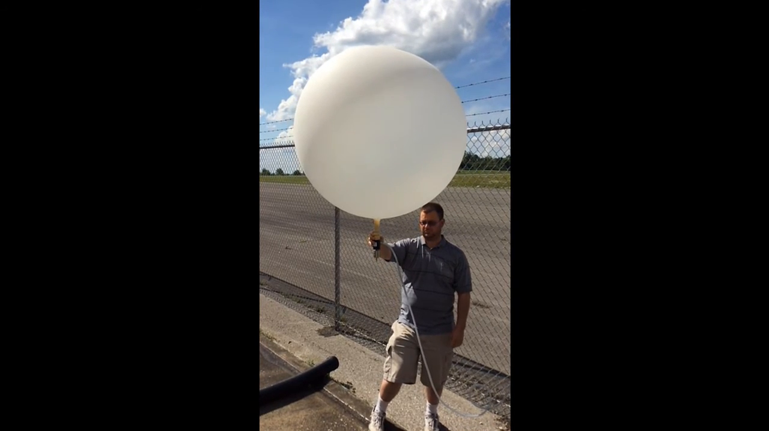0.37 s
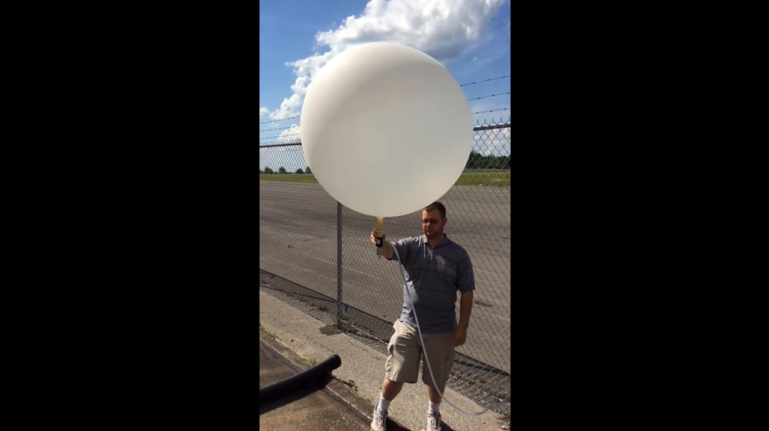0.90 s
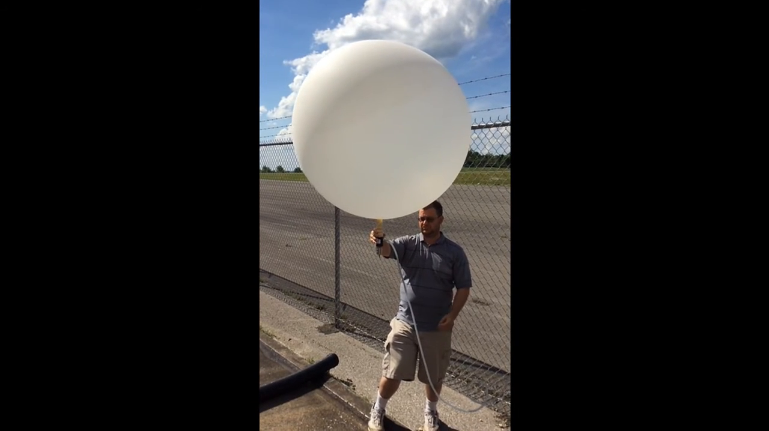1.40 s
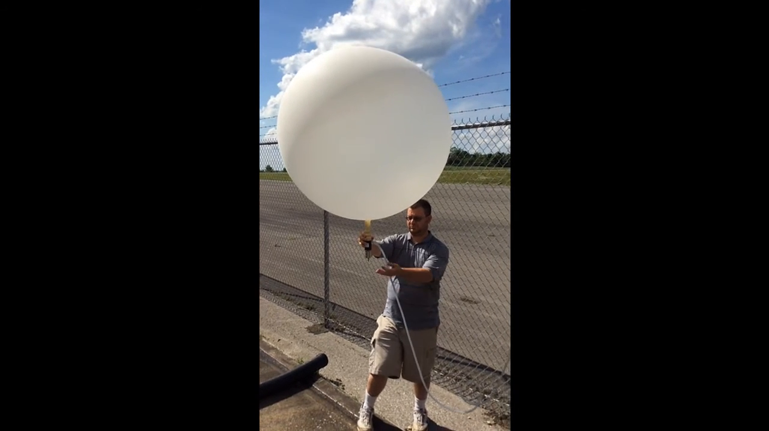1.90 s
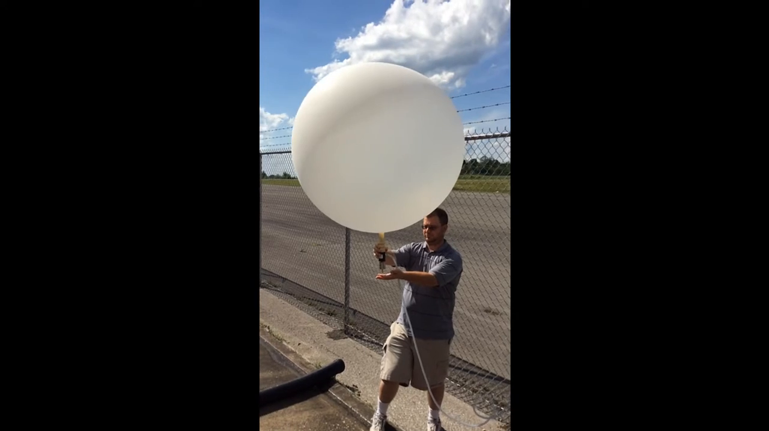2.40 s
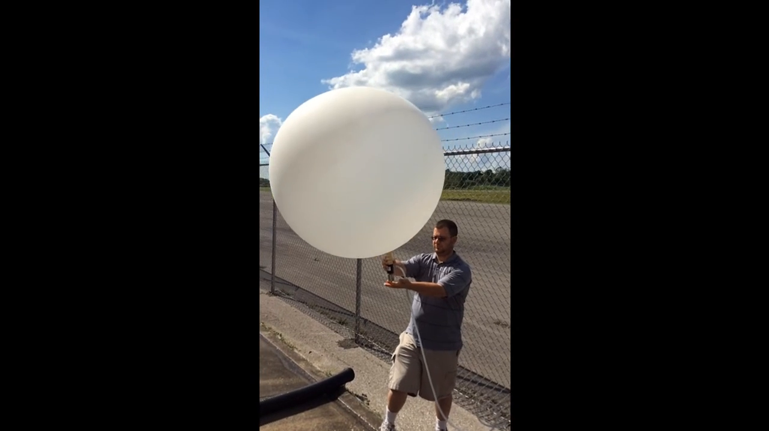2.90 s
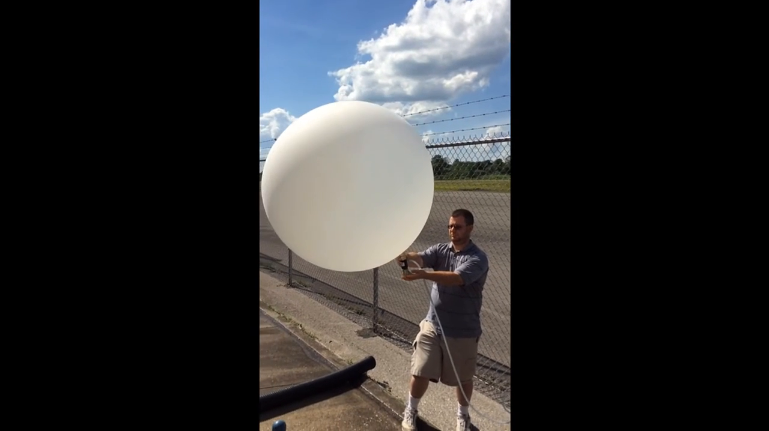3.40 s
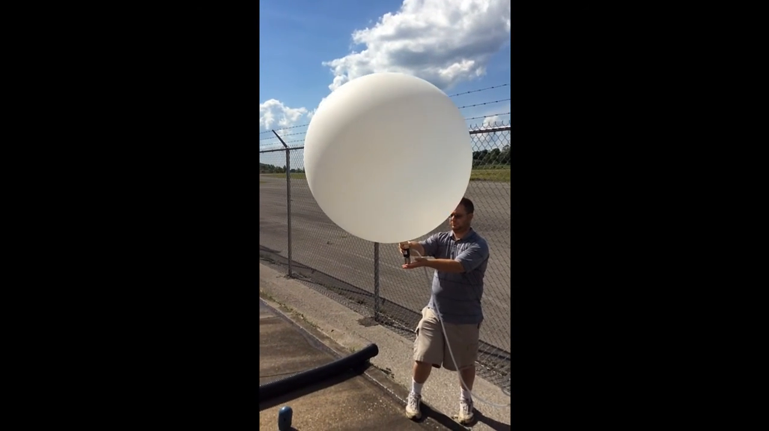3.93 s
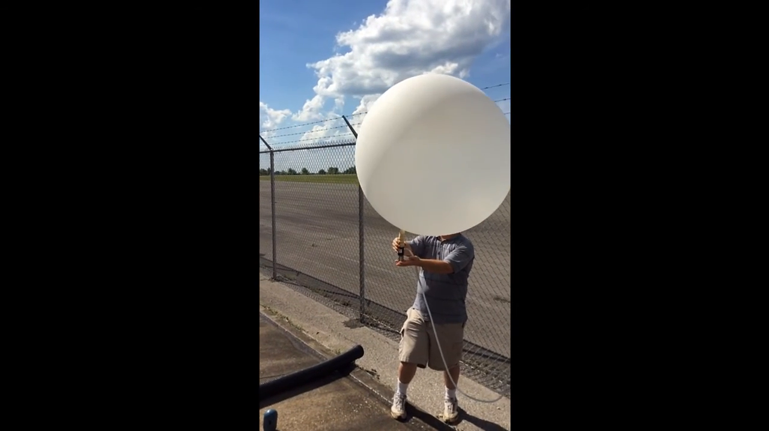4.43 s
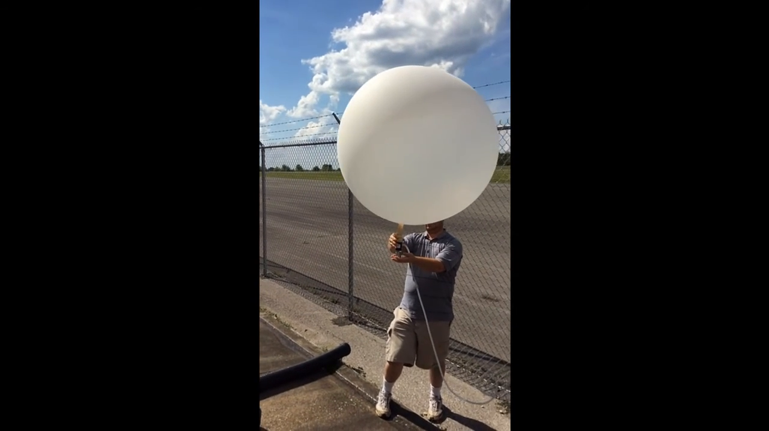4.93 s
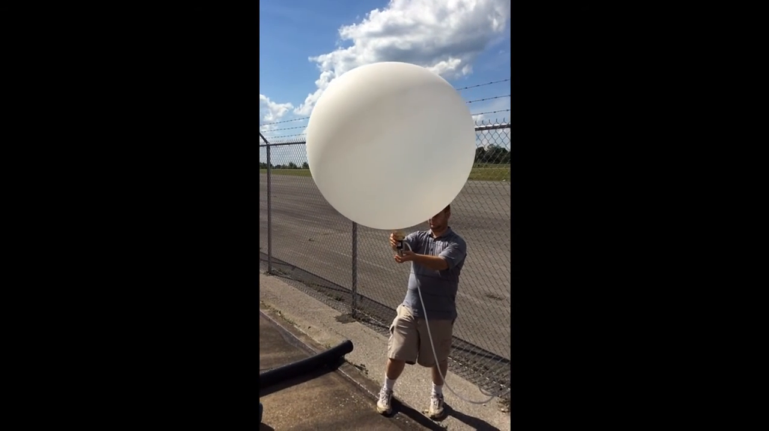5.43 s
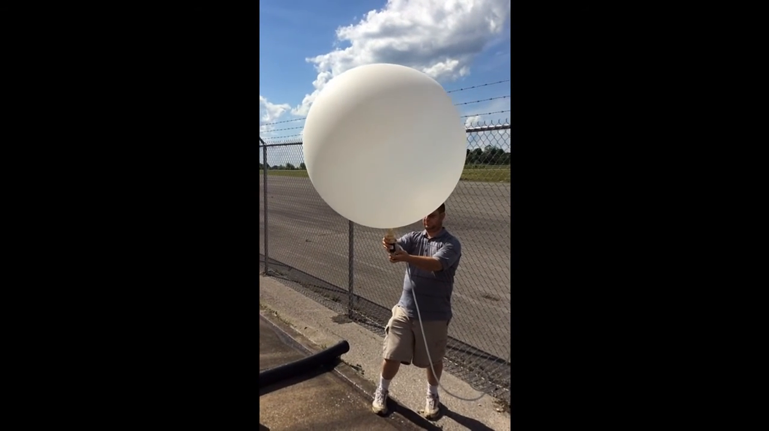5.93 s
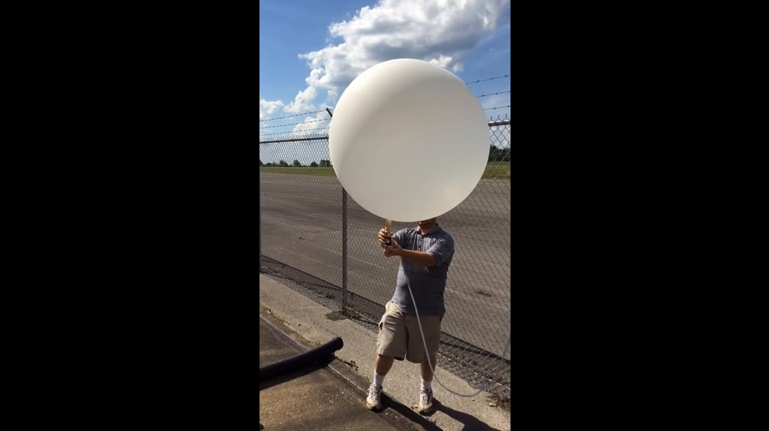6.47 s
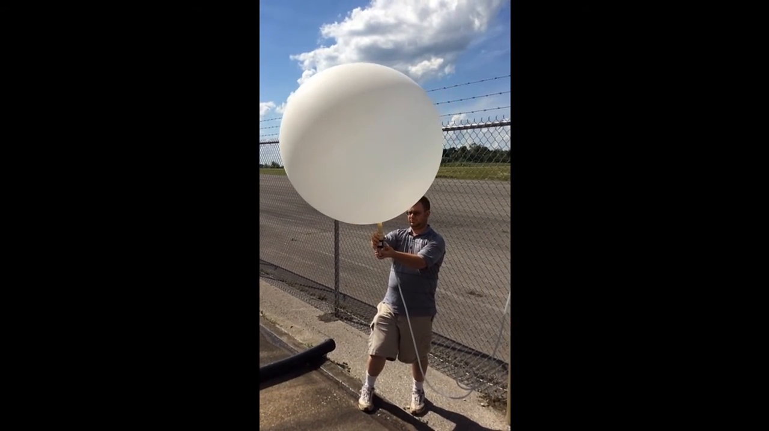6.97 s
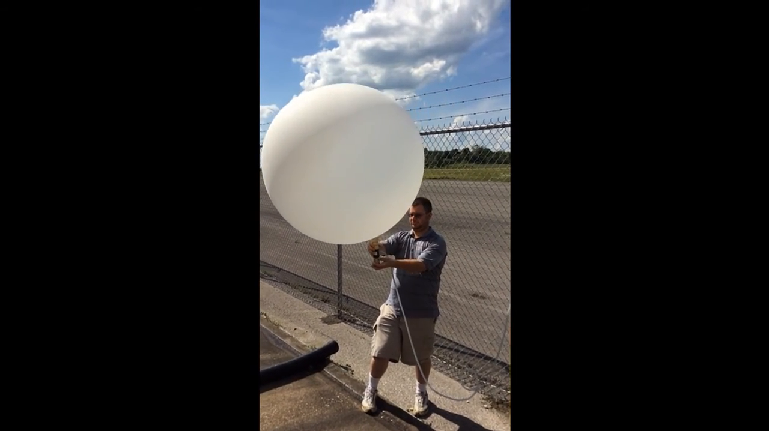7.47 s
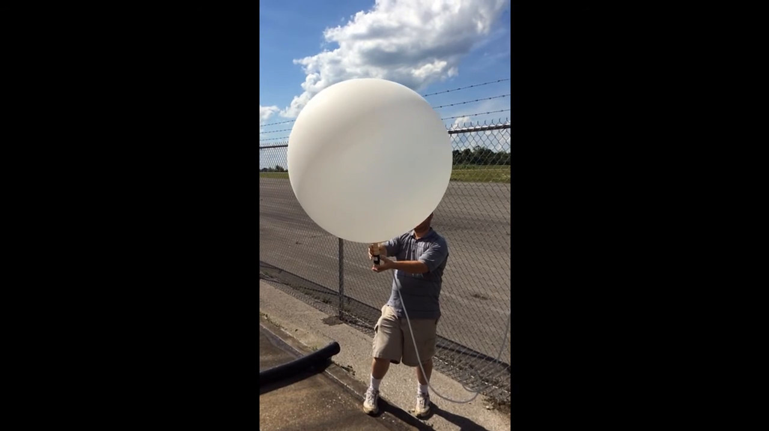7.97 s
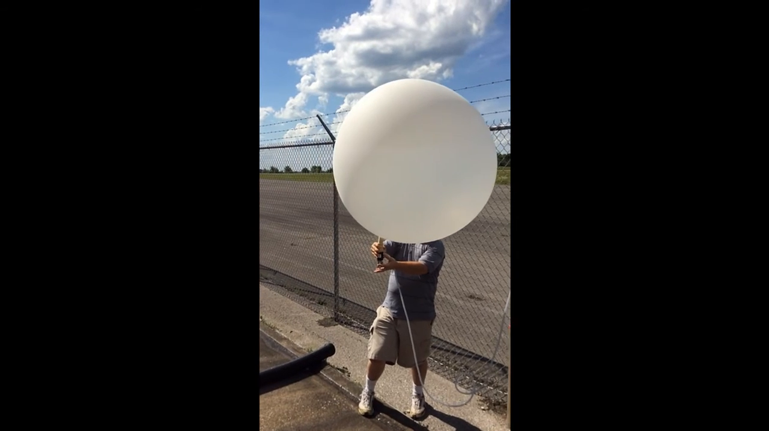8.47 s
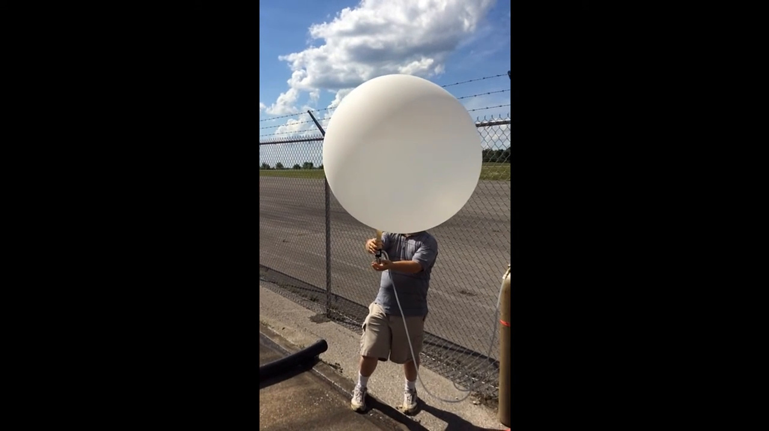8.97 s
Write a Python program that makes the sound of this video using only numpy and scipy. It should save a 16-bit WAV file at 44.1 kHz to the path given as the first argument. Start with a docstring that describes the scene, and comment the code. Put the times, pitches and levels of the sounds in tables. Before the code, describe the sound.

Outdoors on an open paved lot, gas rushes through a hose into a large balloon, a continuous bright hiss heard from a few metres by a hand-held microphone. Wind puffs bump the microphone early on; midway the hiss dips and changes colour as the balloon swings aside, then recovers. Faint equipment hum and distant rumble lie beneath, and the puffs crowd together near the end.

```python
"""Gas hisses through a hose into a large balloon on an open paved lot, a few metres from a hand-held microphone.
Throughout, filtered noise forms the hiss; a ground reflection and short echoes near the hose comb-filter it.
Low noise gives a distant rumble and light wind on the microphone; two sines give the hum of nearby equipment.
Strong wind puffs, short saturated sine bursts, come first near 0.7 s. Around 3.8 s the balloon swings aside:
a gap in the hiss slides down and scattered hiss fills its place. Puffs crowd again from 8.4 s to the end."""
import sys
import numpy as np
from scipy import signal
from scipy.io import wavfile
from scipy.ndimage import uniform_filter1d

SR = 44100
rng = np.random.default_rng(int(sys.argv[2]) if len(sys.argv) > 2 else 0)


def log_audio(samples):
    """Write samples as a 16-bit WAV file to the path given in sys.argv[1]."""
    # one column per channel
    frames = np.atleast_2d(samples).T
    # limit to full scale, then quantise
    limited = np.clip(frames, -1, 1)
    pcm = np.round(limited * 32767).astype(np.int16)
    wavfile.write(sys.argv[1], SR, pcm)


def invert_db(x):
    """Field ratio 10**(x/20) for x, a level in decibels (scalar or array-like)."""
    u = np.asarray(x, float) / 20
    return 10 ** u


N = 401751  # samples

# short-time spectra: window and hop in samples, bin frequencies as a column, frame times as a row
SIZE, HOP = 2048, 512
FRAMES = N // HOP + 5
BIN_HZ = np.fft.rfftfreq(SIZE, 1 / SR)[:, None]
FRAME_S = np.arange(FRAMES) * HOP / SR


def evened(x):
    """Normalization: divides by the root mean square, so that the rms becomes 1."""
    return x / np.sqrt(np.mean(abs(x) ** 2) + 1e-20)


def colour(points, stretch=1):
    """Spectral shaping: gain per bin of total power 1; stretch scales the resonance frequencies."""
    hz, db = np.transpose(points)
    log_hz = np.log(BIN_HZ / stretch + 1)
    gain = invert_db(np.interp(log_hz, np.log(hz + 1), db, left=-120, right=-120))
    return gain / np.linalg.norm(gain, axis=0)


def columns(rows):
    """Linear interpolation: reads each column of a time curve at the frame times."""
    start_s, *rest = np.transpose(rows)
    return [np.interp(FRAME_S, start_s, column) for column in rest]


def patches(bins, frames):
    """Correlated fluctuation: random field smoothed over frequency and time, rms 1."""
    field = rng.standard_normal((FRAMES, len(BIN_HZ))).T
    for _ in range(2):
        field = uniform_filter1d(field, bins, 0)
        field = uniform_filter1d(field, frames, 1)
    return evened(field)


def noise(gain):
    """Gaussian noise by overlap-add of random spectra; a gain of total power 1 gives rms 1."""
    real, imaginary = rng.standard_normal((FRAMES, len(BIN_HZ), 2)).T
    spectra = (real + 1j * imaginary) * gain
    unit = np.sqrt(3) / 2  # power kept by overlapped Hann frames
    return unit * signal.istft(spectra, nperseg=SIZE, noverlap=SIZE - HOP)[1][:N]


def hiss():
    """Turbulent jet noise shaped by hose and neck resonances, its spectrum flickering at random in patches."""
    # main band level, swelling and sinking irregularly, before flicker: start_s, level_db
    flow = [(0, -28), (.15, -22.5), (.45, -24.5), (.7, -27.5), (1.1, -26.5), (1.5, -28), (1.95, -24.5),
            (2.2, -28), (2.55, -26), (2.9, -25.5), (3.35, -26.5), (3.75, -32.5), (4.1, -30.5),
            (4.45, -28.5), (4.95, -26), (5.3, -25.5), (5.8, -27.5), (6.2, -28.5), (6.8, -27), (7.3, -28),
            (7.7, -26), (8.1, -25.5), (8.6, -23.5), (9.11, -23)]
    # low hose note, before its share of the swells and flicker: start_s, level_db
    hose_level = [(0, -38.5), (.8, -37.5), (1.5, -37), (2, -37), (2.8, -37.5), (3.3, -37.5), (4.2, -39),
                  (5, -36), (5.6, -39.5), (6.2, -39.5), (6.6, -37), (7.1, -38), (7.4, -40), (8, -37),
                  (8.5, -39), (9.11, -36)]
    # treble, before swells (fizz only) and flicker: start_s, fizz_db, top_db
    treble = [(0, -26, -48), (.33, -28, -42), (.7, -29.5, -49), (1.5, -30, -55), (2.8, -29, -44),
              (3.8, -32, -47), (4.3, -32, -51), (5, -28.5, -42.5), (6.2, -32.5, -50), (8.3, -29.5, -44),
              (9.11, -29.5, -45)]
    # centre of the main band, whose ratio to the mean slides the spectrum: start_s, centre_hz
    main_centre = [(0, 4345), (1.8, 4350), (2.6, 4306), (3.4, 4370), (5, 4380), (6.3, 4305), (7.8, 4360),
                   (8.6, 4280), (9.11, 4360)]
    # relative spectral density of the hose note: frequency_hz, density_db
    hose_spectrum = [(700, -36), (900, -25.5), (1000, -16.5), (1250, -13), (1400, -6), (1480, -3.5),
                     (1620, -6.5), (1780, -13.5), (1950, -14.5), (2300, -16.5), (2800, -21.5), (3400, -48)]
    # relative spectral density of the main band: frequency_hz, density_db
    main_spectrum = [(2300, -29), (2900, -19), (3600, -15), (4100, -2.5), (4600, -2), (5000, -14.5),
                     (5400, -21.5), (5900, -27), (6200, -80)]
    # relative spectral density of the fizz: frequency_hz, density_db
    fizz_spectrum = [(6300, -45), (6900, -35.5), (7500, -20.5), (8100, -7), (8600, -14.5), (9600, -18),
                     (11000, -19.5), (12300, -15.5), (12900, -22), (13500, -36)]
    # relative spectral density of the top treble: frequency_hz, density_db
    top_spectrum = [(12700, -14), (13300, -5), (13700, 2), (14500, 4), (15250, 3), (15500, -38)]
    # relative spectral density of the scattered hiss: frequency_hz, density_db
    scattered_spectrum = [(5000, -25), (5500, 16), (6200, -3), (6800, 16.5), (7300, 10), (7600, -28.5)]

    (main_db,), (hose_db,), (fizz_db, top_db) = columns(flow), columns(hose_level), columns(treble)
    centre_hz = columns(main_centre)[0]
    swell_db = main_db - main_db.mean()

    # the balloon swings aside and back: 0 to 1 to 0
    swing_s, swing_in_s, swing_out_s = 3.77, 0.43, 0.42
    swing_width_s = np.where(FRAME_S < swing_s, swing_in_s, swing_out_s)
    aside = np.exp(-((FRAME_S - swing_s) / swing_width_s) ** 2)

    # resonances wander with the listening angle, by a share of their pitch
    hose_turn, main_turn, scatter = patches(bins=1, frames=40)[:3]
    main_stretch = centre_hz / centre_hz.mean() + 0.006 * main_turn
    hose_stretch = 1 + 0.01 * hose_turn
    scattered_db = -57.5 + 14 * aside + 3 * scatter

    # hose note and fizz take a share of the main band's swells
    parts = [(colour(main_spectrum, main_stretch), main_db),
             (colour(hose_spectrum, hose_stretch), hose_db + 0.15 * swell_db),
             (colour(fizz_spectrum), fizz_db + 0.054 * swell_db),
             (colour(top_spectrum), top_db),
             (colour(scattered_spectrum), scattered_db)]
    power = sum((gain * invert_db(db)) ** 2 for gain, db in parts)

    flicker_db = 0.97 * patches(bins=30, frames=4) + 0.34 * patches(bins=300, frames=3)
    flicker_db += 1.82 * patches(bins=4, frames=16)  # random narrow ridges in the hiss, shifting slowly

    # the dull gap slides down and grows shallower during the swing
    gap_hz, gap_width_hz = 6060 - 900 * aside, 356
    gap_depth_db = -18 + 6 * aside
    gap_db = gap_depth_db * np.exp(-((BIN_HZ - gap_hz) / gap_width_hz) ** 2)
    return noise(np.sqrt(power) * invert_db(gap_db + flicker_db) * reflections())


def reflections():
    """Comb filtering: drifting, fading echoes interfere with the direct hiss but roughly keep its power."""
    # ground reflection: start_s, delay_ms
    ground_path = [(0, 4.8), (1.7, 4.79), (2.7, 4.65), (3.3, 4.47), (4.1, 4.32), (4.6, 4.2), (5.1, 4.36),
                   (5.6, 4.4), (6.1, 4.32), (6.7, 4.3), (7.1, 4.42), (7.7, 4.16), (8.4, 4.31), (9.11, 4.23)]
    # short echoes near the hose, each with a steady part (strongest at 2.62 ms) and a part wavering at random:
    # # delay_ms, steady_strength, wavering_strength (strengths are plain ratios)
    near_echoes = [(2.62, .15, .1), (2.97, -.05, .1), (1.3, -.05, .1), (2.1, 0, .14), (3.55, 0, .1),
                   (5.5, 0, .1), (6.4, 0, .1), (7.2, 0, .1)]

    # the paving mirrors the bass well and scatters above 4500 Hz
    ground = 0.55 + 0.18 * patches(bins=30, frames=30)
    ground = ground / np.sqrt(1 + (BIN_HZ / 4500) ** 4)
    echoes = ground * np.exp(-2j * np.pi * BIN_HZ * columns(ground_path)[0] / 1000)

    count = len(near_echoes)
    drift, fade = patches(bins=1, frames=30)[:2 * count].reshape(2, count, -1)
    for (delay_ms, steady, wavering), d, f in zip(near_echoes, drift, fade):
        moving_ms = delay_ms + 0.019 * d
        echoes += (steady + wavering * f) * np.exp(-2j * np.pi * BIN_HZ * moving_ms / 1000)

    comb = abs(1 + echoes / (1 + (BIN_HZ / 10000) ** 4))  # all echoes fade above 10 kHz
    return comb / np.sqrt(uniform_filter1d(comb ** 2, size=35, axis=0))


def wind():
    """Turbulent pressure on the diaphragm: lumpy low buffeting, and puffs that flick it for a cycle or two."""
    # buffeting before its random swells: start_s, level_db
    wind_level = [(0, -55), (.5, -49), (.8, -53), (1.2, -47.5), (2, -60), (3.3, -52), (4.2, -50),
                  (5.4, -46.5), (6.1, -48.5), (6.7, -52.5), (7.3, -45), (8, -51), (8.4, -53.5), (9.11, -45)]
    # relative spectral density of the buffeting: frequency_hz, density_db
    buffet_spectrum = [(20, 0), (45, 1), (100, -1.5), (200, -3), (300, -13.5), (500, -18.5)]
    # strong puffs: centre_s, level_db (scales the saturated sine), pitch_hz, width_cycles (full width to 1/e)
    puffs = [(0.7074, -24.5, 190, 2.2), (.728, -27, 140, 1.8), (.749, -34, 190, 1.5),
             (.829, -24.5, 55, 1.2), (0.8286, -25, 159, 1.5), (1.188, -29, 149, 2), (2.568, -34, 60, 0.91),
             (3.286, -34, 60, 1.2), (3.669, -28, 60, 0.65), (4.905, -30, 80, 1.5), (5.314, -28, 65, 0.81),
             (5.465, -29, 80, 1), (6.166, -30, 95, 1.4), (6.219, -37, 120, 1.2), (6.394, -35, 60, 1),
             (6.912, -26, 90, 0.76), (7.405, -28, 70, 1), (7.949, -27.5, 102, 0.81), (8.41, -29, 55, 0.89),
             (8.4127, -29, 203, 2.3), (8.555, -36, 65, 1.1), (8.633, -25.5, 298, 2.5),
             (8.637, -18, 110, 1.15), (8.887, -26, 150, 1.4), (8.982, -28.5, 160, 1.3),
             (9.032, -31, 101, 1.6)]

    lumps_db = 5.0 * patches(bins=24, frames=2)
    gusts_db = 2 * patches(bins=1, frames=15)[0]
    out = noise(colour(buffet_spectrum) * invert_db(columns(wind_level)[0] + lumps_db + gusts_db))

    t = np.arange(N) / SR
    for centre_s, level_db, pitch_hz, width_cycles in puffs:
        near = abs(t - centre_s) < 0.08
        turns = (t[near] - centre_s) * pitch_hz
        flick = np.tanh(1.23 * np.sin(2 * np.pi * turns))  # softly saturated
        out[near] -= invert_db(level_db) * flick * np.exp(-(2 * turns / width_cycles) ** 2)
    return out


def hum():
    """Harmonic radiation of mains equipment: steady sines at orders of the mains, each in random phase."""
    # mains orders: pitch_hz, level_db (rms)
    mains_orders = [(119.95, -46), (359.85, -61.5)]
    t = np.arange(N) / SR
    out = np.zeros(N)
    for pitch_hz, level_db in mains_orders:
        out += np.sqrt(2) * invert_db(level_db) * np.sin(2 * np.pi * (pitch_hz * t + rng.random()))
    return out


def yard():
    """Diffuse outdoor rumble: low-frequency Gaussian noise whose spectrum fluctuates gently."""
    # relative spectral density of the distant rumble: frequency_hz, density_db
    yard_spectrum = [(15, -47), (25, -16), (70, -7), (98, -6.5), (120, -0.5), (315, -12.5), (369, -17),
                     (425, -19), (673, -17), (867, -21), (1100, -25.5), (1430, -47), (2420, -120)]
    level_db = -41 + 1.35 * patches(bins=6, frames=5)
    return noise(colour(yard_spectrum) * invert_db(level_db))


def scene():
    """Superposition: the pressures of all sources add at one microphone."""
    return (hiss() + wind() + hum() + yard())[None]


def band_limit(x):
    """A steep low-pass at the top of the band."""
    return signal.sosfilt(signal.butter(12, 16500, fs=SR, output="sos"), x)


def record(dry):
    """High-pass response of the microphone: a zero-phase filter removes the deepest bass."""
    bass_cut = signal.butter(2, 30, "high", fs=SR, output="sos")
    thin = signal.sosfiltfilt(bass_cut, dry, padtype="even", padlen=SR // 10)
    return band_limit(thin)


dry = scene()
out = record(dry)
log_audio(out)
```